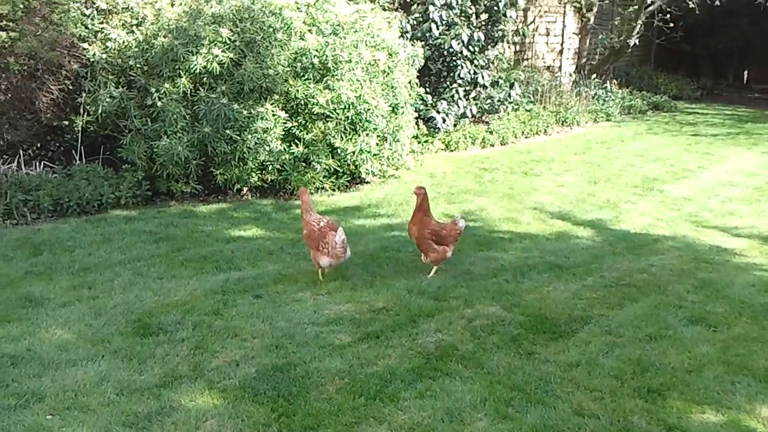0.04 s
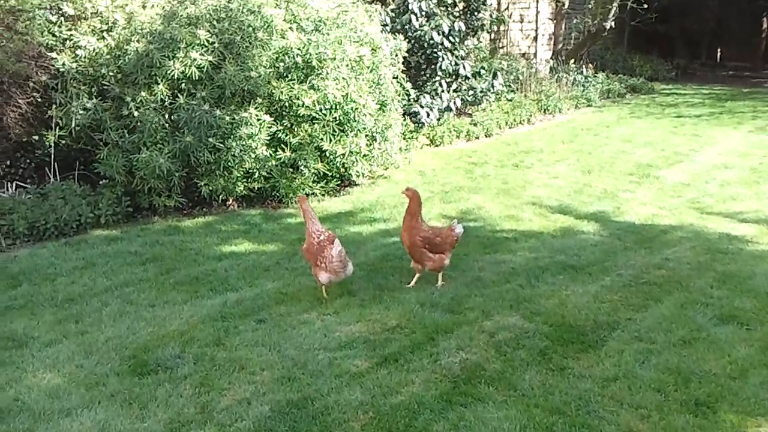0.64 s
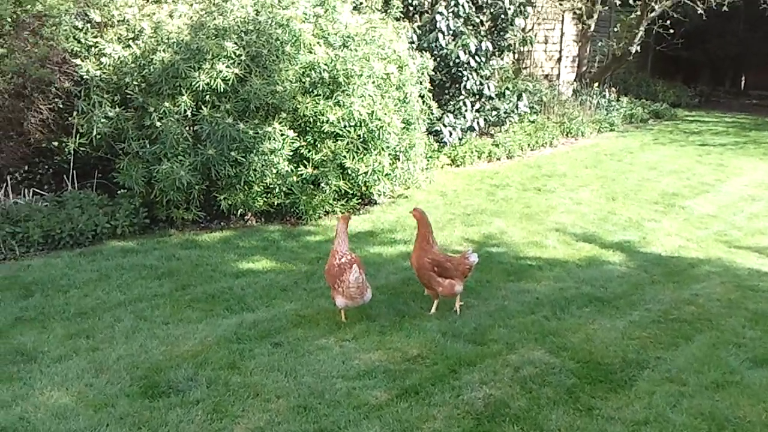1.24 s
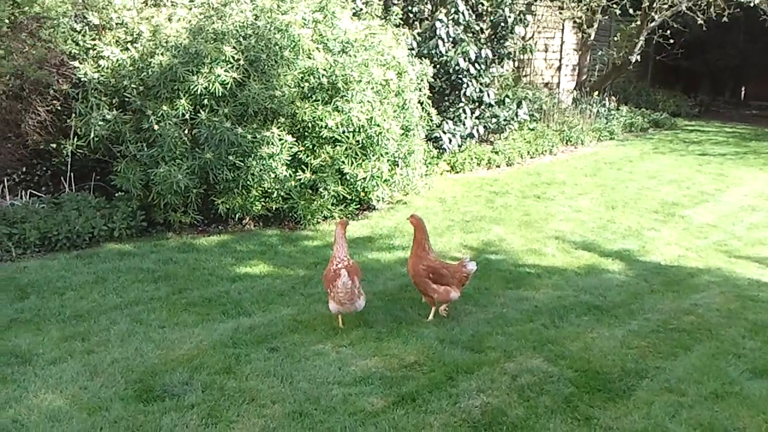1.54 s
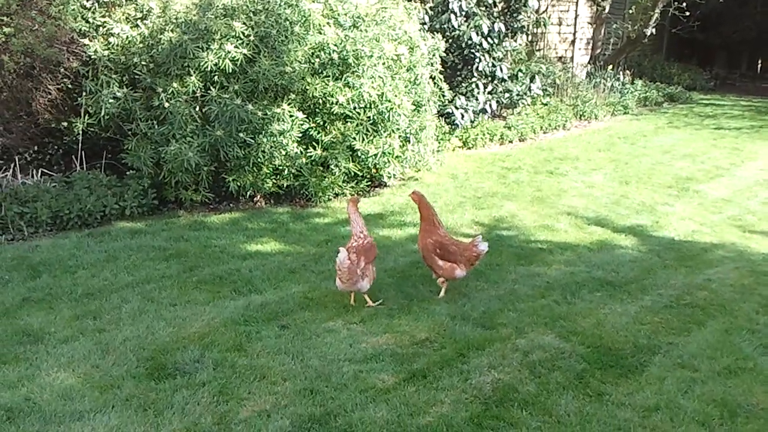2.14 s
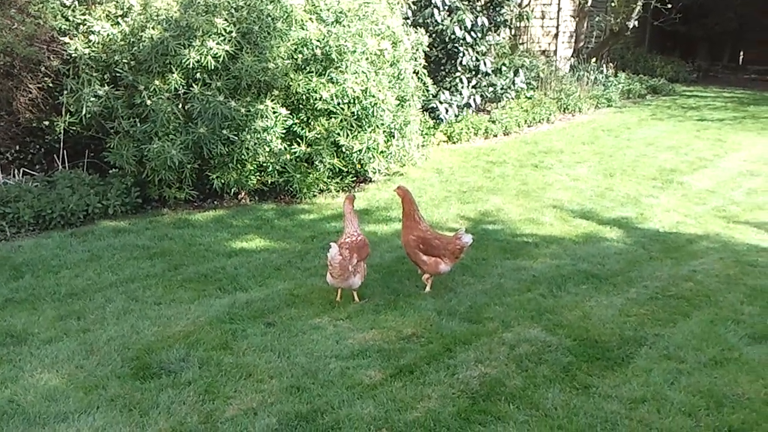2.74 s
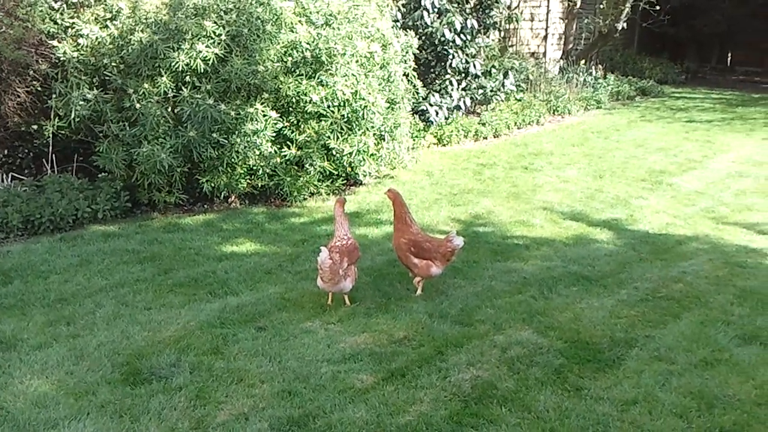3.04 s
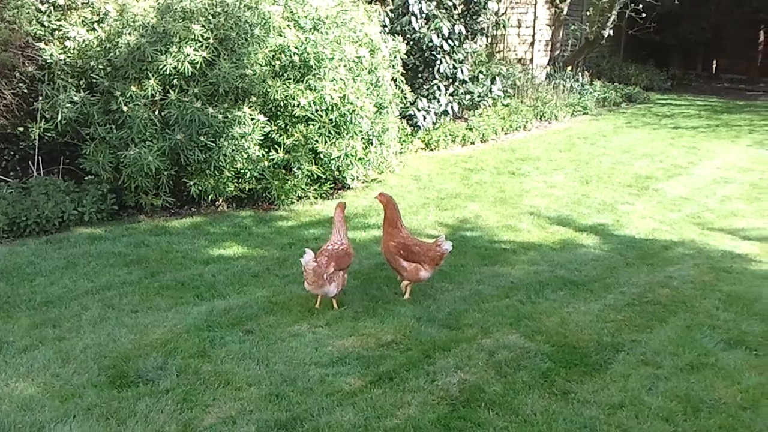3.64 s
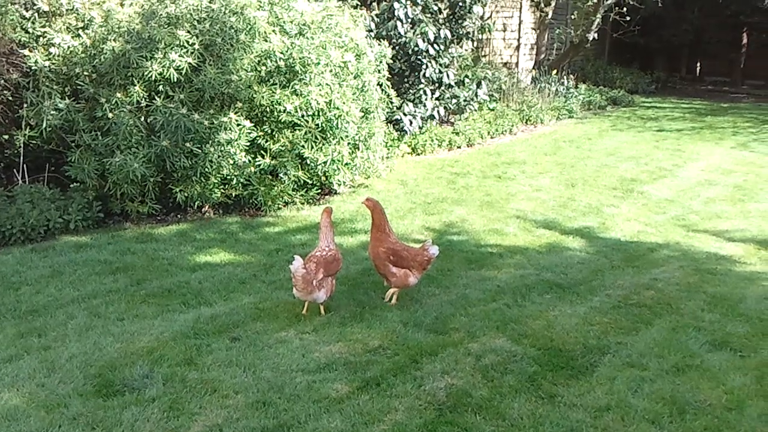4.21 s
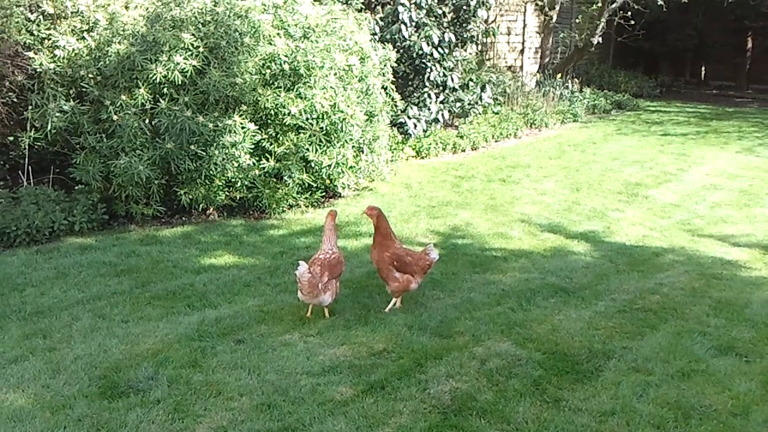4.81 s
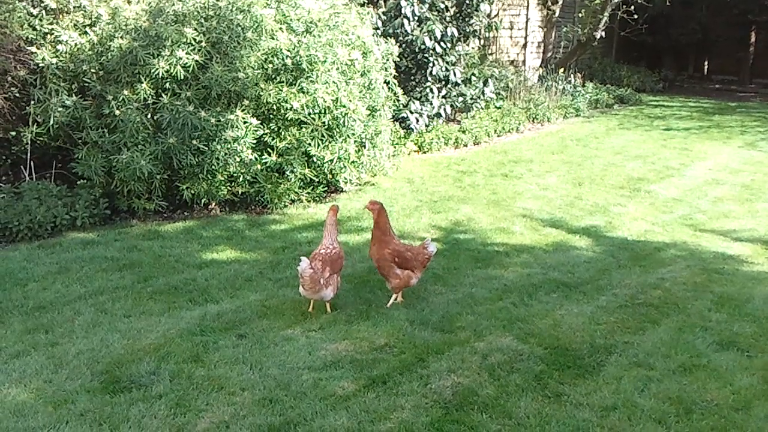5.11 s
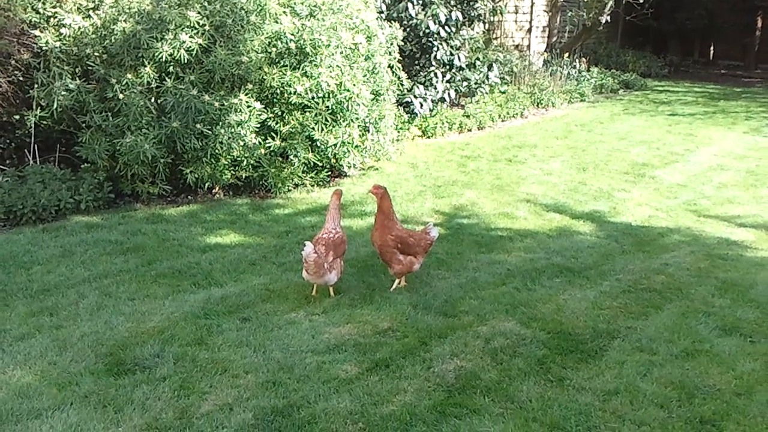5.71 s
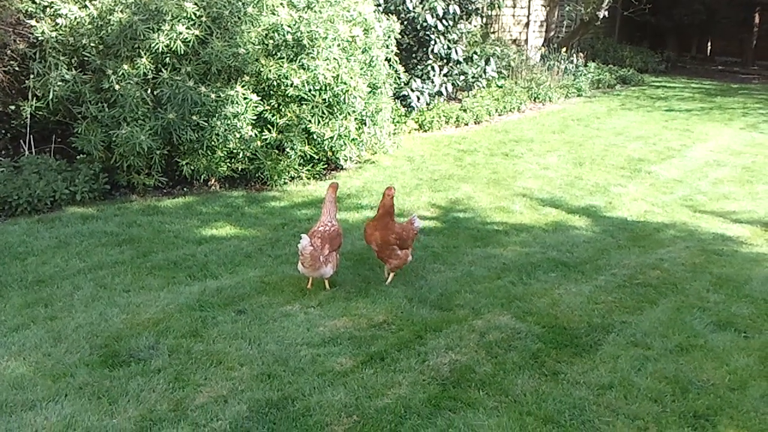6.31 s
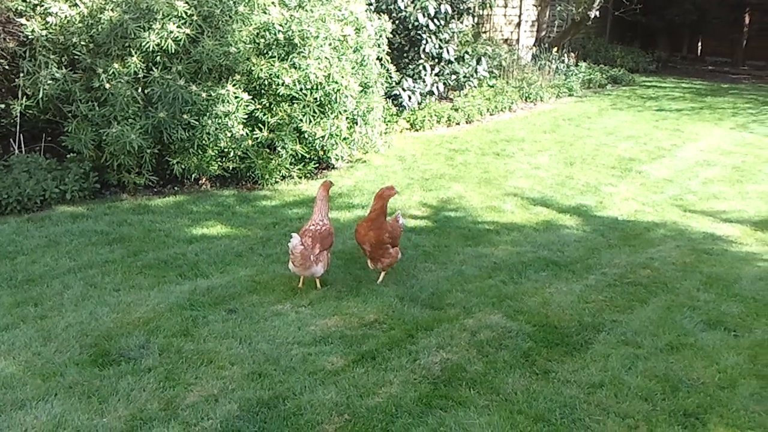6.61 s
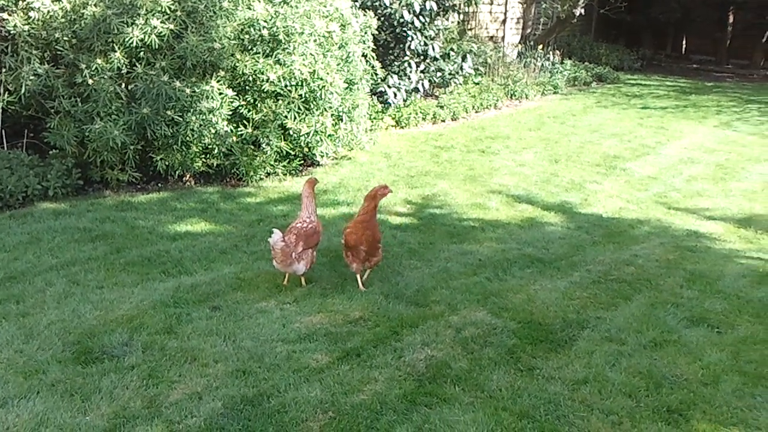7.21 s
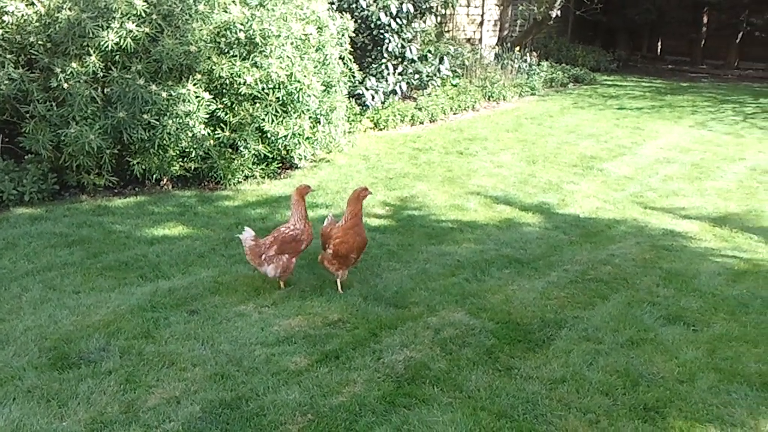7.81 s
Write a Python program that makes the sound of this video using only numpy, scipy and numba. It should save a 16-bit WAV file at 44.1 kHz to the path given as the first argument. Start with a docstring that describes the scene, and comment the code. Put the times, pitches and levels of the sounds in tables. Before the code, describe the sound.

In the first second a songbird chirps faintly some way off, with three small dry ticks. Leaves rustle very softly at about 0.5 and 1.2 seconds. Nearby hens give short, soft, gruff clucks that grow into a loud, hoarse squawk at 2.1 seconds, followed by two clear clucks. Low clucks resume at 3.6 seconds, rising in pitch and level to a second rasping squawk at 4.7, with two more clucks after it. A third run starts at 6 seconds and leads to a squawk at 7.1. A last cluck comes at 7.5 and a few quick, faint ticks at 7.8. Each squawk lasts about a fifth of a second, and the garden returns a slight, short echo. A steady distant rush runs throughout, swelling and brightening near 3 seconds, then gaining a soft hollow hum in the second half.

```python
"""Hens on a lawn. First a songbird chirps over faint ticks, rustling leaves and soft clucks.
The clucks build to a loud, hoarse squawk at 2.1 s; a distant rush swells and brightens near 3 s.
Two more runs lead to squawks at 4.7 s and 7.1 s; a last cluck and a few ticks end the scene.
Each call is a train of syrinx pulses ringing throat and beak; hedge, wall and house send it back."""
import sys
import numpy as np
from scipy import signal
from scipy.fft import rfft, irfft
from scipy.io import wavfile
from scipy.ndimage import uniform_filter1d
from numba import njit

SR = 44100
rng = np.random.default_rng(int(sys.argv[2]) if len(sys.argv) > 2 else 0)


def output_pcm(signal):
    """Save a mono or channel-first signal as 16-bit PCM at the path in sys.argv[1].

    Samples are clipped to [-1, 1] before scaling.
    """
    pcm = np.clip(np.atleast_2d(signal).T, -1, 1) * 32767
    wavfile.write(sys.argv[1], SR, np.round(pcm).astype(np.int16))


N = 350595

# Windpipe and mouth modes. Each row: centre in Hz, width in Hz, gain in dB, share of the facing gain.
TRACT_MODES = [(2050, 300, -3, .2), (2880, 220, -3, 1.15), (4130, 240, -5, .5), (6270, 470, -1.5, .9)]
# The open beak turns toward the listener. Each row: time in seconds, facing gain in dB.
BEAK_FACING = [(2.13, -11), (2.28, -1.5), (2.6, -12.5), (4.72, -3), (4.89, 0.5), (6.4, -11.5), (7.18, 3),
               (7.5, 2.5)]


def hen(start_s, pitch_hz, db, treble_db, rough, doubling, throat_hz, beak_hz,
        breath, beak_db, throat_width_hz):
    """Syrinx pulses, uneven when rough, alternately strong and weak when doubling, ring throat and beak."""
    n = len(pitch_hz)
    phase = 2 * np.pi * np.cumsum(pitch_hz * (1 + .018 * rough * wander(n, 120))) / SR
    subharmonic = np.cos(phase / 2 + .6 * rough ** 2 * wander(n, 60))
    phase = phase + .42 * rough ** 1.5 * wander(n, 300) + .35 * doubling * subharmonic
    strength = 1 + .5 * rough * wander(n, 300) + 1.1 * doubling * subharmonic
    pulses = strength * np.cos(np.outer(phase, np.arange(1, 25))).sum(1)
    # air rasps through the syrinx, harder each time it opens
    airflow = (.1 + .9 * rough) * (1 + .3 * np.cos(phase))
    rasp = airflow * undb(3 * wander(n, 90)) * rng.standard_normal(n)
    # the throat passes mainly the second harmonic and its sidebands
    throat = ring(pulses + 1.9 * rasp, throat_hz, throat_width_hz)
    throat = butter(butter(throat, 570, "high", order=9), 1295, "low", order=9)
    breathy = pulses + breath * rasp
    treble = undb(beak_db) * ring(ring(breathy, beak_hz, 510), beak_hz, 560)
    facing_db = curve(BEAK_FACING, start_s + np.arange(n) / SR)
    for hz, width_hz, mode_db, share in TRACT_MODES:
        mode = ring(ring(breathy, hz, width_hz), hz, 2.36 * width_hz)
        treble += undb(mode_db + share * facing_db) * mode
    treble = butter(treble, 1300, "high", order=6)
    return undb(db) * (steady(throat, span_s=.0056) + undb(treble_db) * steady(treble, span_s=.012))


# Loud calls. Each row: start in seconds; break, settling and release in seconds after it;
# base level in dB; relative treble in dB; split roughness 0-1; throat at the break in Hz;
# crack strength 0-1; open-beak resonance at start and at release in Hz.
SQUAWK_CALLS = [(2.103, .024, 0.12, 0.18, -15, -7.5, 0.72, 850, 0.6, 3980, 3550),
                (4.693, 0.013, 0.088, 0.19, -15, -4.5, 0.96, 857, 0.88, 4010, 3430),
                (7.128, .029, .108, 0.18, -14, -4.5, 0.57, 940, 0.13, 3820, 3920)]


def squawks():
    """A clean rising note breaks into a hoarse split voice, settles high, cracks and drops away."""
    start_hz, rise_hz_per_s, ceiling_hz, top_hz, end_hz = 335.5, 4600, 426.3, 575.2, 348.3
    attack_s, break_span_s, climb_s = .0076, .0064, .055
    settle_span_s, crack_s, fall_s = .058, .009, .035
    clean_rough, held_rough, split_doubling, held_doubling = .07, .38, .8, .046
    out = np.zeros(N)
    for (start_s, break_s, settle_s, release_s, db, treble_db,
         split_rough, split_hz, crack_size, beak_start_hz, beak_end_hz) in SQUAWK_CALLS:
        t = np.arange(0, release_s + fall_s, 1 / SR)
        # stages of the call, each within 0-1
        broken = ramp(t, break_s - break_span_s / 2, break_span_s)
        settled = ramp(t, settle_s - settle_span_s / 2, settle_span_s)
        crack = crack_size * np.exp(-((t - release_s) / crack_s) ** 2)
        fall = ramp(t, release_s, fall_s)
        since_break_s = np.maximum(t - break_s, 0)
        strain = np.exp(-since_break_s / climb_s)

        clean_hz = np.minimum(start_hz + rise_hz_per_s * t, ceiling_hz)
        sung_hz = blend(clean_hz, top_hz - 50.16 * strain, broken)
        pitch_hz = blend(end_hz, sung_hz, (1 - fall) ** 1.5)
        rough = blend(clean_rough, blend(split_rough, held_rough, settled), broken) + crack
        doubling = broken * blend(split_doubling, held_doubling, settled)
        level_db = db - 17 * np.exp(-t / attack_s) - 3 * broken * strain - 15.5 * fall
        bright_db = treble_db - 6.5 * (1 - broken) - 1.5 * settled + 3 * crack + 4.5 * np.sin(np.pi * fall)
        # the throat tracks the second harmonic, but lies below it while the voice is split
        throat_hz = blend(2 * pitch_hz, split_hz + 1200 * since_break_s, broken * (1 - settled))
        beak_shut = 1 - broken + crack
        beak_hz = blend(beak_start_hz, beak_end_hz, ramp(t, 0, release_s)) - 334 * beak_shut
        voice = hen(start_s, pitch_hz, level_db, bright_db, rough, doubling, throat_hz, beak_hz,
                    breath=8.4, beak_db=3, throat_width_hz=240)
        add(out, start_s, voice * signal.windows.tukey(len(t), .03))
    return out


# Short calls. Each row: middle in seconds, length in seconds, mid pitch in Hz, level in dB,
# base relative treble in dB.
CLUCK_CALLS = [ (0.192, .032, 406, -35, -17), (0.437, 0.033, 417, -32, -15),
               (1.173, .034, 411, -32.5, -16.5), (1.332, 0.032, 421, -34, -16),
               (1.378, 0.03, 399, -32, -18.5), (1.569, 0.038, 356, -35, -13),
               (1.818, 0.045, 391, -28.5, -14.5), (2.031, 0.033, 384, -28, -14.5),
               (2.432, .042, 479.7, -21, -13), (2.642, 0.05, 464, -23.5, -11.5),
               (3.572, .046, 375, -33, -24), (3.768, 0.034, 372, -31, -24), (3.981, .038, 386, -29, -25),
               (4.213, 0.051, 392, -30, -20), (4.416, 0.043, 421, -27, -16.5),
               (4.621, 0.044, 444.6, -24.5, -10.5), (5.043, .05, 472, -21, -11.5),
               (5.279, .035, 432, -29.5, -18.5), (6.029, .035, 414, -33, -13.5),
               (6.458, 0.035, 425, -26, -12.5), (6.658, 0.037, 436, -24, -11.5),
               (6.859, .038, 431, -25.5, -9.5), (7.052, 0.048, 449.3, -22.5, -9),
               (7.478, 0.043, 483, -19.5, -10.5)]


def clucks(gruff_hz=378, clear_hz=468.7):
    """The beak opens and shuts once: pitch and level arch. Low clucks are gruff and slide upward."""
    out = np.zeros(N)
    for middle_s, length_s, middle_hz, db, treble_db in CLUCK_CALLS:
        u = np.linspace(-1, 1, int(length_s * SR))
        clear = ramp(middle_hz, gruff_hz, clear_hz - gruff_hz)
        rough = blend(.69, .22, clear)
        rise = blend(.16, -.02, clear)
        pitch_hz = middle_hz * (1 - .22 * u ** 2 + rise * u / 2)
        throat_hz = 2 * pitch_hz + 130 * rough
        beak_hz = 3600 * (1 + .021 * (.2 - u ** 2))
        bright_db = treble_db + 1.5 - 15 * (u - .1) ** 2  # treble escapes while the beak is widest
        voice = hen(middle_s, pitch_hz, db, bright_db, rough, 0, throat_hz, beak_hz,
                    breath=3.2, beak_db=1.5, throat_width_hz=225)
        envelope = undb(-11 * u ** 2) * signal.windows.tukey(len(u), .15)
        add(out, middle_s - length_s / 2, voice * envelope)
    return out


# Faint clicks. Each row: start in seconds, peak in dB, ring in Hz, relative knock in dB, T60 in seconds.
DRY_TICKS = [(0.06, -29.5, 5360, 1, 0.011), (.249, -24.5, 5230, 2, 0.0071), (0.935, -21, 5150, 2.5, 0.0095),
             (7.819, -24.5, 5900, -14, 0.085), (7.845, -24.5, 5800, -21, .025),
             (7.856, -28.5, 6030, -23, 0.1), (7.884, -31.5, 5600, -22, 0.036)]


def ticks(attack_s=.0003, knock_hz=950):
    """Short noise bursts excite a bright ring over a dull knock."""
    out = np.zeros(N)
    t = np.arange(SR // 10) / SR
    for start_s, peak_db, hz, knock_db, t60_s in DRY_TICKS:
        burst = rng.standard_normal(len(t)) * undb(-60 * t / t60_s) * (1 - np.exp(-t / attack_s))
        click = ring(ring(burst, hz, 1000), hz, 2000) + undb(knock_db) * ring(burst, knock_hz, 2200)
        add(out, start_s, undb(peak_db) * click / np.abs(click).max())
    return out


# Bird notes. Each row: start in seconds, length in seconds, start, middle and end pitch in Hz,
# level in dB.
SONGBIRD_NOTES = [(0, 0.053, 3600, 3790, 3820, -47), (0.079, 0.058, 3680, 3150, 2980, -46.5),
                  (0.228, 0.092, 3900, 3477, 3340, -42.5), (0.294, 0.078, 3450, 3420, 3420, -47.5),
                  (0.446, 0.0574, 3140, 3440, 3380, -44), (0.583, 0.077, 5270, 5260, 5300, -54),
                  (0.697, 0.082, 3130, 2980, 2520, -51)]


def songbird():
    """Thin whistles glide through three pitches."""
    out = np.zeros(N)
    for start_s, length_s, start_hz, middle_hz, end_hz, db in SONGBIRD_NOTES:
        u = np.linspace(-1, 1, int(length_s * SR))
        hz = middle_hz + (end_hz - start_hz) / 2 * u + ((start_hz + end_hz) / 2 - middle_hz) * u ** 2
        phase = 2 * np.pi * np.cumsum(hz * (1 + .01 * wander(len(u), 150))) / SR
        add(out, start_s, undb(db) * unit(np.sin(phase) * np.sqrt(1 - u ** 2)))
    return out


# Soft swells of noise. Each row: middle in seconds, length in seconds, centre in Hz, top level in dB.
NOISE_SWELLS = [(0.493, 0.26, 5660, -53.5), (1.159, .21, 5750, -49.5), (3.098, 1.3, 1800, -50.5)]


def noise_swells(width_hz=1600):
    """Leaves rustle twice, high and brief; near 3 s a swell around 1.8 kHz brightens the distant rush."""
    out = np.zeros(N)
    for middle_s, length_s, hz, db in NOISE_SWELLS:
        n = int(length_s * SR)
        hiss = ring(ring(rng.standard_normal(n), hz, width_hz), hz, width_hz)
        add(out, middle_s - length_s / 2, undb(db) * unit(hiss) * np.hanning(n))
    return out


# Reflections off hedge, wall and house. Each row: delay in seconds, gain in dB.
GARDEN_ECHOES = [(.021, -20), (0.04, -20.5), (0.065, -30.5), (.105, -27), (0.137, -29.5)]


def garden(x, scatter_db, t60_s, treble_db, treble_t60_s):
    """Add distinct echoes and a thin tail scattered by leaves, with its own decay in the treble."""
    t = np.arange(SR // 2) / SR
    scatter = undb(scatter_db) * rng.standard_normal(len(t)) * (1 - np.exp(-t / .005)) / np.sqrt(SR)
    response = butter(scatter, 1600, "low", order=3) * undb(-60 * t / t60_s)
    response += butter(scatter, 1800, "high", order=3) * undb(treble_db - 60 * t / treble_t60_s)
    for delay_s, db in GARDEN_ECHOES:
        response[int(delay_s * SR)] += undb(db)
    return x + signal.fftconvolve(x, butter(response, 7000, "low"))[:N]


# Spectrum of the rush. Each row: frequency in Hz, relative density in dB.
RUSH_SPECTRUM = [(18, -57.5), (30, -32), (58, -18), (111, -19), (216, -12.5), (463, -10), (632, -3),
                 (924, -5), (1020, -9.5), (1450, -9), (2450, -19), (3590, -22), (4550, -32), (6360, -29),
                 (8870, -51), (11500, -102.5), (19500, -120)]
# Swells of its low, middle and high bands. Each row: time in seconds, gain in dB.
RUMBLE_GAIN = [(0, 2), (1, -2.5), (1.7, 1), (3.7, 4), (7.4, 1.5), (7.9, 7.5)]
BODY_GAIN = [(0, -8), (.9, -7.5), (3.05, 2.5), (3.7, -.5), (4.401, 1.1), (7.9, .5)]
HISS_GAIN = [(0, 3.1), (1.5, .5), (3.7, 3.2), (7.901, 4.9)]


def rush(base_db=-38.5, flicker_db=.9):
    """Distant outdoor noise whose bands swell and flicker."""
    t = np.arange(N) / SR
    rumble_db, body_db, hiss_db = (curve(rows, t) for rows in (RUMBLE_GAIN, BODY_GAIN, HISS_GAIN))
    log_hz = np.log(np.maximum(np.arange(N // 2 + 1) * SR / N, 1))
    shape_hz, shape_db = np.transpose(RUSH_SPECTRUM)
    shape = undb(np.interp(log_hz, np.log(shape_hz), shape_db))
    noise = unit(irfft(rfft(rng.standard_normal(N)) * shape, N))
    spectrum = rfft(noise)
    centres_hz = [30, 90, 300, 700, 1500, 3000, 5500]
    gains_db = [2 * rumble_db, rumble_db, body_db, body_db, body_db, (body_db + hiss_db) / 2, hiss_db]
    out = np.zeros(N)
    for share, db in zip(np.eye(len(centres_hz)), gains_db):
        band = irfft(spectrum * np.interp(log_hz, np.log(centres_hz), share), N)
        out += band * undb(base_db + db + flicker_db * wander(N, 18))
    return out


# Hollow tones in the rush. Each row: centre in Hz, width in Hz, base level in dB, share of the swell.
DRONE_BANDS = [(156, 44, -60.5, 0.05), (680, 155, -42.5, 0.97)]
# Their slow swell. Each row: time in seconds, gain in dB.
DRONE_GAIN = [(0, -16.5), (4.5, -3.5), (6.2, 1.5), (7.901, 1.5)]


def drones():
    """Narrow bands of noise grow slowly into hollow drones."""
    swell_db = curve(DRONE_GAIN, np.arange(N) / SR)
    out = np.zeros(N)
    for hz, width_hz, db, share in DRONE_BANDS:
        band = ring(ring(rng.standard_normal(N), hz, width_hz), hz, 2 * width_hz)
        out += undb(db + share * swell_db) * unit(band)
    return out


def undb(db):
    """Decibels to gain."""
    return 10 ** (np.asarray(db) / 20)


def unit(x):
    """Scale to rms 1."""
    return x / np.sqrt(np.mean(x ** 2))


def steady(x, span_s):
    """Hold the short-term rms at 1."""
    size = int(span_s * SR)
    power = uniform_filter1d(uniform_filter1d(x ** 2, size), size)
    return x / np.sqrt(np.abs(power) + 1e-12)


def blend(a, b, share):
    """Go from a to b as share goes from 0 to 1."""
    return a + (b - a) * share


def ramp(x, start, span):
    """Rise from 0 at start to 1 a span later."""
    return np.clip((x - start) / span, 0, 1)


def curve(rows, t):
    """Interpolate (time, value) rows linearly at times t."""
    return np.interp(t, *np.transpose(rows))


def wander(n, hz):
    """Random drift of rms about 1, low-passed at hz."""
    return unit(butter(rng.standard_normal(n + SR // 10), hz, "low"))[-n:]


def add(out, start_s, x):
    """Mix x into out from start_s."""
    i = max(int(start_s * SR), 0)
    out[i:i + len(x)] += x[:N - i]


def butter(x, hz, kind, order=2):
    """Low-pass or high-pass."""
    return signal.sosfilt(signal.butter(order, hz, kind, fs=SR, output="sos"), x)


@njit
def svf(x, hz, width_hz):
    """State-variable band-pass, gain 1 at its moving centre."""
    y, band_state, low_state = np.empty(len(x)), 0., 0.
    for i in range(len(x)):
        g, damping = np.tan(np.pi * hz[i] / SR), width_hz / hz[i]
        band = (band_state + g * (x[i] - low_state)) / (1 + g * (g + damping))
        band_state = 2 * band - band_state
        low_state += 2 * g * band
        y[i] = damping * band
    return y


def ring(x, hz, width_hz):
    """One resonance, still or moving."""
    return svf(x, hz + np.zeros(len(x)), float(width_hz))


def scene():
    """Hens and ticks nearby, the songbird further off, the rush behind; mono."""
    near = squawks() + clucks() + ticks() + noise_swells()
    near = garden(near, scatter_db=4.5, t60_s=.47, treble_db=1.5, treble_t60_s=.35)
    far = garden(songbird(), scatter_db=10.5, t60_s=.43, treble_db=2.5, treble_t60_s=.24)
    return (near + far + rush() + drones())[None]


def record(dry, rolloff_hz=6820, cutoff_hz=8800):
    """The microphone rolls off the treble; a steep low-pass cuts the top."""
    dull = butter(dry, rolloff_hz, "low", order=8)
    return signal.sosfilt(signal.ellip(8, .2, 70, cutoff_hz, fs=SR, output="sos"), dull)


dry = scene()
out = record(dry)
output_pcm(out)
```